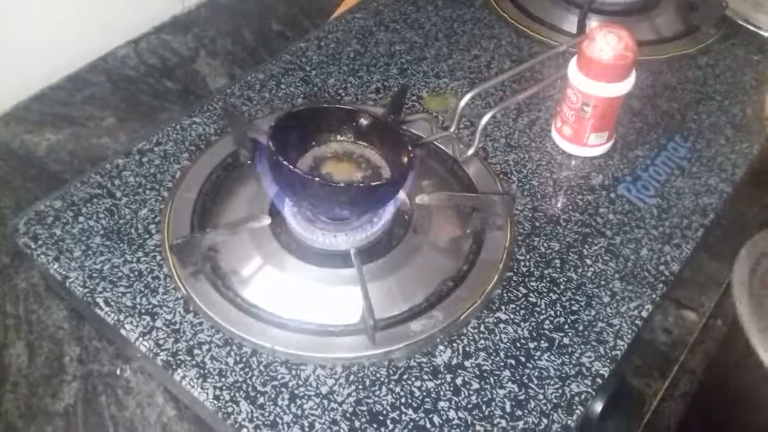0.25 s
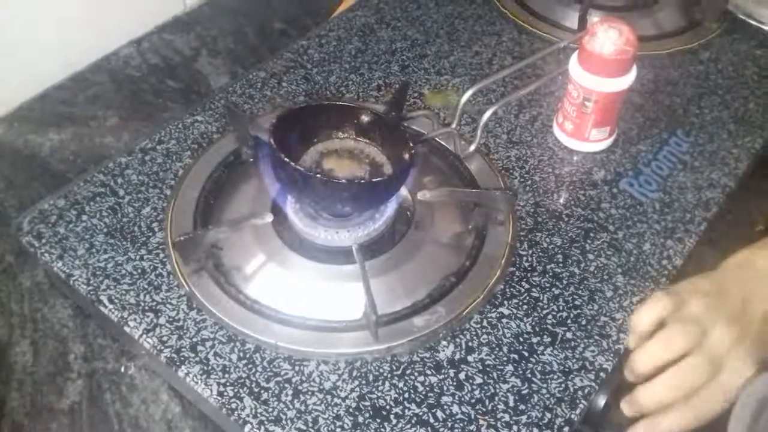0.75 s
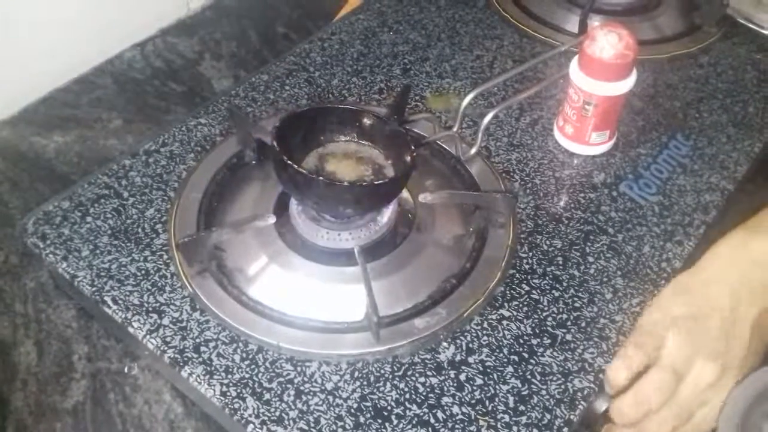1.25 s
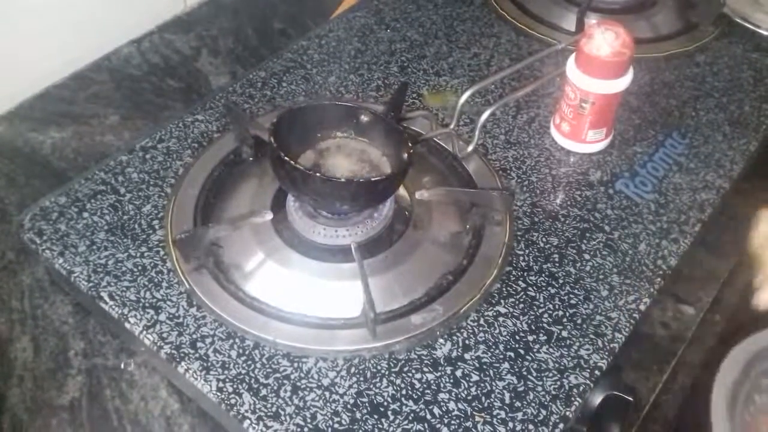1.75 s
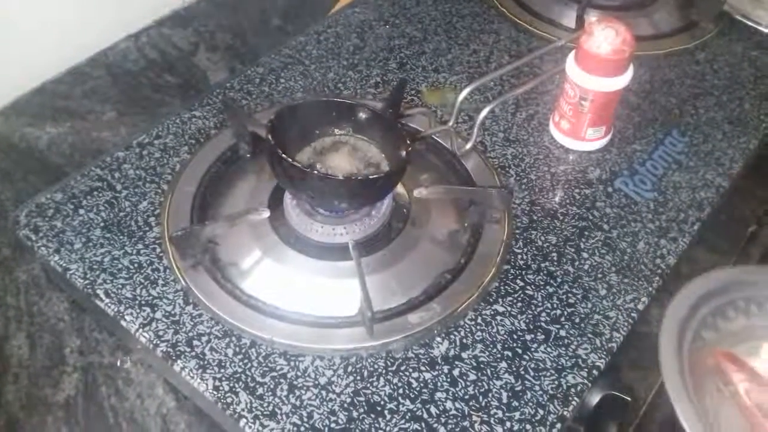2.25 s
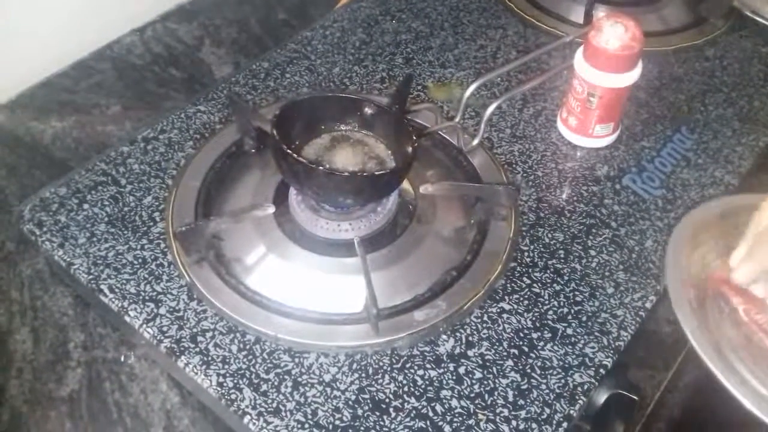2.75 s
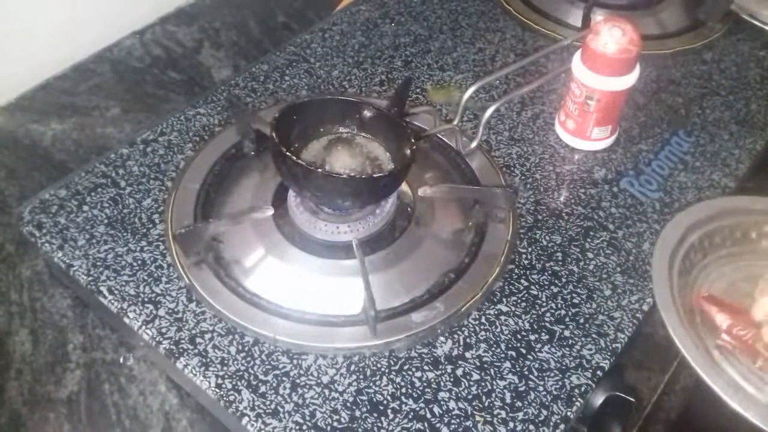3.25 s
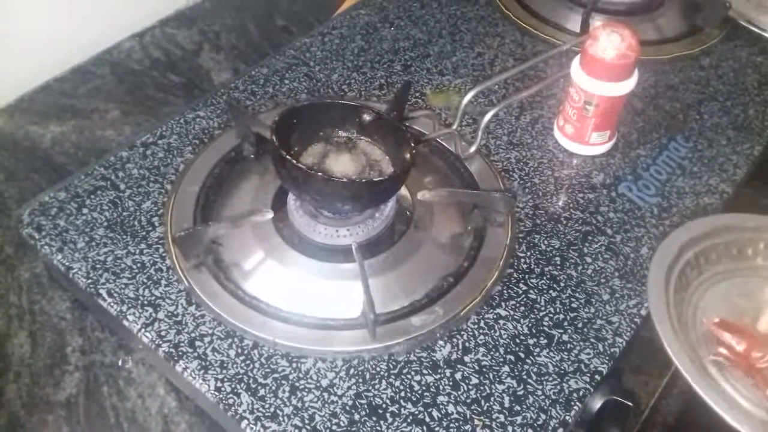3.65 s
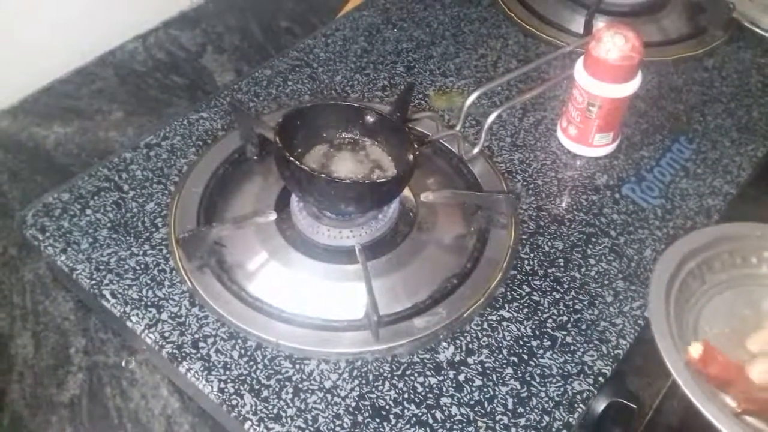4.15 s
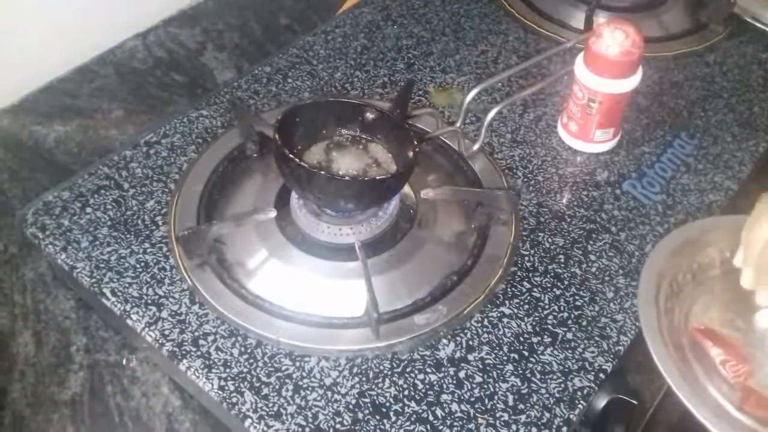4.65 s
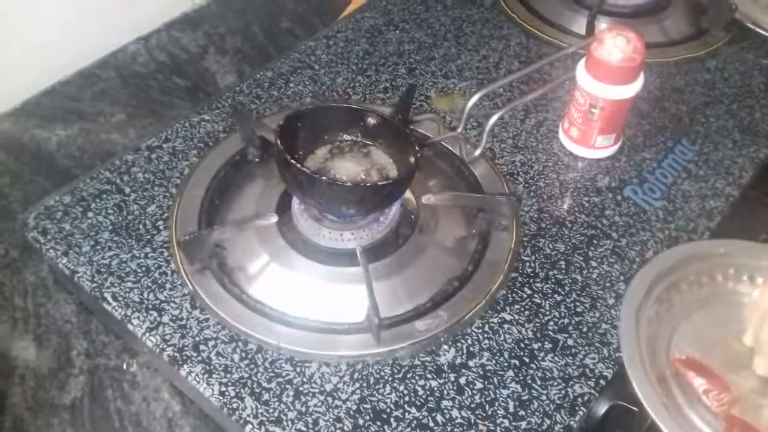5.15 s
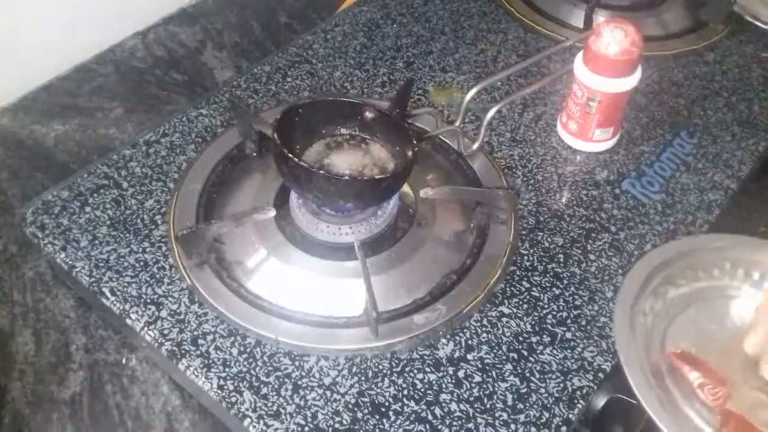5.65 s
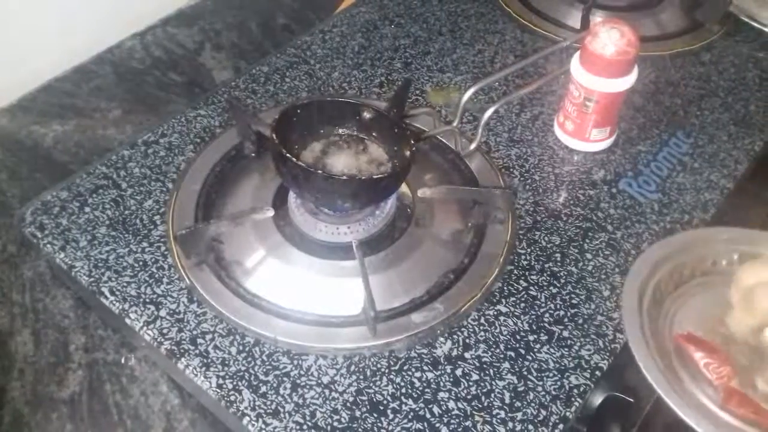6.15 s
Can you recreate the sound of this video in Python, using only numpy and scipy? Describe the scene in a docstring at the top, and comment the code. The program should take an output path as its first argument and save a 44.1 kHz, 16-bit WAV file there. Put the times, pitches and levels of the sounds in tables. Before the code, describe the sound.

Close to a small iron pan on a gas burner, hot oil sizzles, spits and gurgles over a soft flame. Mustard seeds burst with sharp bright snaps and short wet splutters of steam. The oil foams between one and two seconds, slightly lowering the snaps and changing the sizzle. From three seconds many pops are louder, crowding together at the end. Nearly mono, with a short hard kitchen reverberation.

```python
"""Mustard seeds pop in hot oil in a small iron pan on a gas burner, in a kitchen, heard from close by.
From the start the oil sizzles, spits and gurgles (bubble crackle, blurred notes) over a soft flame (noise).
Each husk bursts with a snap (a few cycles of a sine) and a spurt of steam that splutters (grainy noise).
Between 1 and 2 s the oil foams up: the snaps drop in pitch and the sizzle changes colour.
From about 3 s on many pops are louder."""
import sys
import numpy as np
from scipy import signal
from scipy.fft import rfft, irfft, next_fast_len
from scipy.io import wavfile
from scipy.ndimage import map_coordinates

SR = 44100
rng = np.random.default_rng(int(sys.argv[2]) if len(sys.argv) > 2 else 0)


def inscribe(sig):
    """Save sig as 16-bit PCM at rate SR to the path in sys.argv[1].

    A 1-D sig is mono; a 2-D sig holds one channel per row.
    Samples are clipped to [-1, 1] before scaling.
    """
    pcm = np.round(np.clip(np.atleast_2d(sig).T, -1, 1) * 32767)
    wavfile.write(sys.argv[1], SR, pcm.astype(np.int16))


N = 283122

# The loudest bursting seeds. Each row: start in seconds, then relative levels in dB of snap, steam, oil spray.
SEED_POPS = [(0.1026, -33.5, -25.5, -57), (0.1443, -21.5, -31, -46), (0.2883, -43, -28.5, -45),
             (0.4445, -20, -26, -39), (0.488, -35, -28.5, -44), (0.584, -26.5, -36, -41),
             (0.7906, -26.5, -31, -46.5), (0.943, -23.5, -31, -52), (0.9879, -33, -34, -60),
             (1.072, -32, -28, -45), (1.1328, -34, -36, -46), (1.1638, -27.5, -40, -59),
             (1.2114, -43, -36, -49), (1.3143, -35, -44, -49), (1.343, -27, -34, -45),
             (1.4163, -25, -31, -45.5), (1.4835, -28, -32, -53), (1.5348, -23, -35, -50),
             (1.577, -30, -22, -50), (1.6489, -23, -28.5, -40), (1.6923, -26, -25, -48),
             (1.7554, -37, -22, -41), (1.7659, -38, -25.5, -48), (1.786, -38, -22, -44),
             (1.7947, -32, -20, -34), (1.8116, -35, -40, -52), (2.052, -27, -29, -44.5),
             (2.1005, -31, -31.5, -43.5), (2.1379, -28, -34, -51), (2.265, -48, -37, -56),
             (2.3153, -46, -27.5, -73), (2.4439, -47, -27.5, -47.5), (2.4826, -23.5, -25, -45),
             (2.574, -27, -30, -42.5), (2.6141, -24, -27.5, -45), (2.7194, -27, -26, -43),
             (2.8125, -34, -31, -45), (2.8437, -19, -31, -44), (2.8976, -27.5, -49, -45),
             (2.9586, -33, -36, -47.5), (2.9846, -15, -18, -56), (3.0214, -30, -40, -44),
             (3.0612, -17, -28, -39), (3.0674, -21, -36, -45), (3.1462, -23, -26, -41),
             (3.1676, -14.5, -26, -70), (3.2749, -27, -38, -45), (3.3233, -24.5, -26, -44),
             (3.3925, -17, -31, -46), (3.562, -34, -34, -58), (3.6084, -15.5, -22.5, -38),
             (3.658, -40, -25.5, -48), (3.7347, -22.5, -17.5, -36.5), (3.8457, -27, -44, -47),
             (3.8853, -25.5, -30, -50), (3.9633, -33, -31, -48), (4.0031, -29, -29, -58),
             (4.0418, -31, -22, -37), (4.073, -25, -26.5, -38), (4.1411, -25, -28, -36),
             (4.2298, -24.5, -19, -41.5), (4.2867, -19, -24, -46), (4.3221, -25, -24, -48),
             (4.5047, -23.5, -32, -40), (4.5374, -17.5, -23, -40.5), (4.7164, -24, -25.5, -43.5),
             (4.8444, -32, -24.5, -41.5), (5.013, -29, -47, -46), (5.021, -20.5, -28.5, -45),
             (5.0878, -29, -18, -39.5), (5.0938, -17.5, -18, -50), (5.3009, -41, -36, -53.5),
             (5.3953, -34, -23.5, -42.5), (5.44, -18.5, -23.5, -55), (5.5199, -27, -23, -85),
             (5.5479, -29, -23.5, -67), (5.6121, -24.5, -28.5, -42.5), (5.6535, -25, -30, -50),
             (5.681, -31, -24.5, -39.5), (5.7012, -17, -22, -47), (5.7519, -19, -23, -35),
             (5.7987, -23.5, -33, -47), (5.8239, -21.5, -22, -43), (5.844, -17, -20.5, -42),
             (5.8889, -24, -27, -43), (6.0212, -20.5, -27, -47), (6.055, -18, -24, -38),
             (6.1108, -14.5, -17.5, -42), (6.1488, -18, -23, -42), (6.2032, -26, -29, -42),
             (6.2133, -22, -21.5, -37.5), (6.2633, -13.5, -28, -41), (6.2806, -15, -32, -43),
             (6.3057, -25, -23, -65), (6.3135, -12, -28.5, -48), (6.4124, -38, -19, -50)]
# Spectrum of fine oil spray. Each row: frequency in Hz, relative density in dB.
SPRAY_SPECTRUM = [(300, -44), (3500, -2), (5300, 10.5), (7000, 1.5), (10000, 3), (12500, -2.5), (16000, -2)]
CLEAR_HZ, FOAMY_HZ = 4135, 3838  # mean snap pitch in clear oil and in foam
TYPICAL_STEAM_DB = -25.5


def amp(db):
    """Decibels to gain."""
    return 10 ** (np.asarray(db) / 20)


def unit(x):
    """Scale to rms 1."""
    return x / np.sqrt(np.mean(x ** 2) + 1e-20)


def along(points, hz):
    """Read (Hz, value) points on a log axis."""
    f, v = np.transpose(points)
    return np.interp(np.log(hz + 1), np.log(f + 1), v)


def wobble(rate_hz):
    """A smooth random curve, rate_hz knots a second."""
    knots = rng.standard_normal(int(N * rate_hz / SR) + 4)
    return map_coordinates(knots, [np.arange(N) * rate_hz / SR])


def lumpy(t, rate_hz, knots, depth_db):
    """Random gain of rms 1 over times t, drawn in dB at rate_hz knots a second."""
    return unit(amp(depth_db * np.interp(t * rate_hz, np.arange(len(knots)), knots)))


def filtered(x, response):
    """x times a complex response of frequency."""
    m = next_fast_len(N + SR // 2)
    return irfft(rfft(x, m) * response(np.fft.rfftfreq(m, 1 / SR)), m)[..., :N]


def add(track, s, sound):
    """Mix a sound into the track from time s."""
    start = int(np.clip(round(s * SR), 0, N))
    track[start:start + len(sound)] += sound[:N - start]


def coloured(x, spectrum):
    """x with the given spectrum, at rms 1."""
    return unit(filtered(x, lambda hz: amp(along(spectrum, hz))))


def crackle(spectrum, rate_hz, spread_db):
    """Tiny bubbles bursting at random, rate_hz a second on average, of varying size."""
    bursts = (rng.random(N) < rate_hz / SR) * rng.choice([-1, 1], N)
    size_db = spread_db * np.clip(rng.standard_normal(N), -2, 2)
    return coloured(bursts * amp(size_db), spectrum)


def ragged(pitch_hz, blur_hz):
    """A noisy note of rms 1 that follows the pitch, about blur_hz wide to each side."""
    t = np.arange(len(pitch_hz)) / SR
    knots = rng.standard_normal((2, 400))
    a, b = [map_coordinates(k, [t * 2 * blur_hz], mode="mirror") for k in knots]
    phase = 2 * np.pi * np.cumsum(pitch_hz) / SR
    return unit(a * np.cos(phase) + b * np.sin(phase))


def foam(s):
    """Share of the oil covered by foam at time s, 0-1."""
    middle_s, length_s = 1.52, 1
    return np.clip(.5 + (s - middle_s) / length_s, 0, 1)


def sizzle(sizzle_db=-5.5, spray_db=-26, foam_db=4, foam_damp_db=-1.5, flicker_db=4.5):
    """The oil fizzes all along; as it foams up its colour changes and it throws more spray."""
    # Each row: time in seconds, overall level in dB before flicker.
    simmer = [(0.0, -39.5), (0.39, -43), (1.23, -44), (1.64, -42.5), (2.11, -44), (3.07, -38.5),
              (3.48, -45.5), (4.17, -37), (4.88, -46), (5.43, -40.5), (5.56, -40.5), (6.42, -38)]
    # Sizzle of clear oil, then of foamy oil. Each row: frequency in Hz, relative density in dB.
    fresh_spectrum = [(820, -40), (1400, -13), (1760, -10), (1900, -1), (2420, -1.5), (2960, -5.5),
                      (3080, 0), (3360, -1.5), (4370, 1), (5350, -21), (6240, -29), (7000, -26),
                      (9100, -52), (15400, -120)]
    foamy_spectrum = [(820, -84), (1400, -35), (1750, -0.5), (1900, 3), (2060, -0.5), (2450, 1),
                      (2650, -4.5), (2960, -3), (3820, 7.5), (4520, -4), (4830, -4), (7000, -27),
                      (9100, -26), (15400, -120)]
    t = np.arange(N) / SR
    cover = foam(t)
    fresh = crackle(fresh_spectrum, rate_hz=1500, spread_db=3.5)
    foamy = crackle(foamy_spectrum, rate_hz=900, spread_db=-0.5)
    spray = amp(spray_db + foam_db * cover) * crackle(SPRAY_SPECTRUM, rate_hz=2000, spread_db=6.5)
    fizz = amp(sizzle_db) * (np.sqrt(1 - cover) * fresh + amp(foam_damp_db) * np.sqrt(cover) * foamy)
    level_db = np.interp(t, *np.transpose(simmer)) + flicker_db * wobble(30)
    return amp(level_db) * (fizz + spray)


def flame(flame_db=-54.0):
    """The gas flame rushes with a slight flutter: coloured noise with a wobbling level."""
    # Each row: frequency in Hz, relative density in dB.
    rush_spectrum = [(20, 9), (50, -14), (80, -13), (125, -11), (170, -6.5), (255, -7.5), (370, -4.5),
                     (600, 0.5), (900, -3), (1200, -5), (1600, -2.5), (3000, -32.5)]
    flutter_db = 1.5 * wobble(25)
    return amp(flame_db + flutter_db) * coloured(rng.standard_normal(N), rush_spectrum)


def spits(gain_db=-11, t60_s=0.16, rise_s=0.00093, blur_hz=520, grain_db=4):
    """Now and then the wet oil spits with a throaty rasp that breaks up into droplets."""
    # Each row: start in seconds, relative level in dB, pitch in Hz.
    spit_events = [(0.0044, -30.5, 2097), (0.812, -24, 2290), (1.486, -19.5, 1907), (2.9846, -18.5, 2510),
                   (3.5694, -35, 2420), (4.2863, -19, 2460), (4.3202, -21, 3210), (4.8845, -29.5, 2360),
                   (5.3971, -22.5, 2445), (5.6162, -26.5, 2390), (6.0202, -21, 2520), (6.1108, -17, 2368),
                   (6.1372, -14.5, 2810)]
    out, t = np.zeros(N), np.arange(SR // 5) / SR
    for s, db, hz in spit_events:
        droplets = lumpy(t, 350, rng.standard_normal(100), grain_db)
        spurt = (1 - np.exp(-t / rise_s)) * amp(-60 * t / t60_s)
        add(out, s, amp(db + gain_db) * spurt * droplets * ragged(np.full(len(t), hz), blur_hz))
    return out


def burble(level_db=-53, spread_db=4, low_hz=260, high_hz=1500, decay_cycles=3, count=600):
    """Small bubbles blip all over the pan, each ringing a few cycles and rising a little."""
    out, t = np.zeros(N), np.arange(SR // 20) / SR
    places = rng.random((count, 2))
    chances = np.clip(rng.standard_normal(count), -2, 2)
    for (when, size), chance in zip(places, chances):
        hz = high_hz + (low_hz - high_hz) * size
        age = t * hz / decay_cycles
        phase = 2 * np.pi * hz * t * (1 + 0.015 * np.minimum(age, 4))
        blip = (1 - np.exp(-6 * age)) * np.exp(-age) * np.sin(phase)
        add(out, when * N / SR, amp(level_db + spread_db * chance) * np.sqrt(hz / low_hz) * blip)
    return out


def snap_pitch(s):
    """Mean pitch of a bursting husk in Hz: it drops as the oil foams."""
    return CLEAR_HZ + (FOAMY_HZ - CLEAR_HZ) * foam(s)


def snaps(seeds, rise_s=0.00058, echo_db=-27, tick_db=-24, scatter=0.033):
    """A split husk rings for a few cycles; the pan wall and stove top scatter it back."""
    out, t = np.zeros(N), np.arange(SR // 20) / SR
    for s, db in seeds:
        hz = snap_pitch(s) * np.exp(scatter * rng.standard_normal())
        snap = t / rise_s * np.exp(1 - t / rise_s) * np.sin(2 * np.pi * hz * t)
        walls = rng.standard_normal(len(t)) * (t > .002) * np.exp(-t / 0.012)
        echo = signal.fftconvolve(snap, walls)[:len(t)]
        tick = np.diff(rng.standard_normal(len(t) + 1)) * np.exp(-t / 0.00012)  # the husk tearing
        add(out, s, amp(db) * (snap + amp(tick_db) * tick + amp(echo_db) * unit(echo)))
    return out


def small_seeds(level_db=-34.0, spread_db=4.0, mist_db=-65, mist_spread_db=3, mist_t60_s=0.047, count=200):
    """Many smaller seeds crack at random among the loud ones; each throws a brief mist of oil."""
    times = rng.uniform(0, N / SR, count)
    size, wet = np.clip(rng.standard_normal((count, 2)), -2, 2).T
    mist_power, t = np.zeros(N), np.arange(SR // 10) / SR
    for s, db in zip(times, mist_db + spread_db * size + mist_spread_db * wet):
        add(mist_power, s, amp(db - 60 * t / mist_t60_s) ** 2)
    cracks = snaps(zip(times, level_db + spread_db * size), rise_s=0.00041, scatter=0.068)
    return cracks + np.sqrt(mist_power) * crackle(SPRAY_SPECTRUM, rate_hz=3900, spread_db=3)


def gurgles(gain_db=-10, swell_s=0.01043, glug_db=-12, glug_hz=320, grain_db=2.5):
    """A steam pocket glugs, and its ragged note climbs as it nears the surface and opens."""
    # Steam pockets. Each row: time in seconds, relative level in dB, pitch in Hz.
    pockets = [(0.104, -37, 906), (0.188, -40.5, 834), (0.528, -31, 1227), (0.561, -35, 862),
               (0.582, -37.5, 1075), (0.793, -37.5, 752), (1.193, -36, 665), (1.25, -36.5, 1194),
               (1.486, -30.5, 983), (1.705, -35, 1173), (1.813, -33, 1194), (2.202, -35, 1048),
               (2.309, -38.5, 1253), (2.557, -40, 1143), (2.595, -45, 957), (2.727, -41, 955),
               (2.81, -40, 1098), (2.932, -39, 737), (3.121, -42, 873), (3.226, -32.5, 1126),
               (3.353, -41, 1190), (3.459, -37, 1200), (3.519, -42, 928), (3.713, -34, 853),
               (3.906, -38.5, 873), (4.306, -37.5, 723), (4.511, -35, 964), (4.593, -34.5, 850),
               (4.673, -34.5, 1107), (4.773, -37.5, 1198), (4.959, -38, 1166), (5.018, -40.5, 1103),
               (5.249, -35, 1107), (5.303, -39, 944), (5.492, -36.5, 1190), (6.002, -37, 1210),
               (6.111, -38, 863), (6.233, -34, 1263), (6.398, -38, 1190)]
    out, t = np.zeros(N), np.arange(SR // 10) / SR
    blur_hz, octaves_per_s = 210, 22
    for s, db, hz in pockets:
        haste, climb = np.exp(rng.standard_normal(2) * [.15, .3])
        pitch_hz = hz * 2 ** np.clip(climb * octaves_per_s * (t - swell_s), -.7, .2)
        glug = amp(glug_db) * ragged(np.full(len(t), glug_hz), blur_hz)
        age = haste * t / swell_s
        swell = age * np.exp(1 - age)
        lumps = lumpy(t, 200, rng.standard_normal(32), grain_db)
        add(out, s - .002, amp(db + gain_db) * swell * lumps * (ragged(pitch_hz, blur_hz) + glug))
    return out


def splutter(levels_db, spectrum, shifts, gain_db, rise_s, burst, grain_db, t60_s, colour_db=2):
    """Steam leaves each seed in a hard first burst, then dies away in small bubbles; hard pops last longer."""
    out, t = np.zeros(N), np.arange(SR // 3) / SR
    hz = np.fft.rfftfreq(len(t), 1 / SR)
    for (_s, _, steam_db, _), db, shift in zip(SEED_POPS, levels_db, shifts):
        noise, lumps, colour = rng.standard_normal((3, len(t)))
        own_db = colour_db * np.interp(hz / 1800, np.arange(len(t)), colour)  # no two husks split alike
        steam = unit(irfft(rfft(noise) * amp(along(spectrum, hz / shift) + own_db), len(t)))
        bubbles = lumpy(t, 330, lumps, grain_db)
        life_s = t60_s * np.exp(0.0148 * (steam_db - TYPICAL_STEAM_DB))
        spurt = (1 - np.exp(-t / rise_s)) * (bubbles * amp(-60 * t / life_s) + burst * np.exp(-t / 0.0014))
        add(out, _s, amp(db + gain_db) * spurt * steam)
    return out


def steam_spurts(body_db=-36.5, body_follows=0.49, body_with_spray=0.094):
    """Each pop splutters near its snap pitch, with a lower body that grows more slowly, and throws fine spray."""
    # Body, then main splutter. Each row: frequency in Hz, relative density in dB, before the shift per seed.
    low_spectrum = [(70, -25), (200, -21.5), (700, -9.5), (1300, -5), (1850, 5.5), (2500, 1.5), (3000, -7),
                    (3800, -22.5)]
    high_spectrum = [(150, -49), (900, -25.5), (2200, -26), (3100, -7), (3700, 3.5), (4100, -1.5),
                     (4500, -6), (4800, -11), (5500, -12.5), (6600, -30.5), (9000, -53)]
    s, _, steam_db, spray_db = np.transpose(SEED_POPS)
    varied = np.exp(0.078 * rng.standard_normal(len(SEED_POPS)))
    low_db = body_db + body_follows * (steam_db - TYPICAL_STEAM_DB)
    low_db = low_db + body_with_spray * (spray_db - spray_db.mean())
    low = splutter(low_db, low_spectrum, varied, gain_db=-3, rise_s=0.00084,
                   burst=0.85, grain_db=1.6, t60_s=0.14, colour_db=2.5)
    high = splutter(steam_db, high_spectrum, snap_pitch(s) / FOAMY_HZ, gain_db=-7.5, rise_s=0.001,
                    burst=0.31, grain_db=1.5, t60_s=0.14)
    spray = splutter(spray_db, SPRAY_SPECTRUM, varied, gain_db=-3.5, rise_s=0.00005,
                     burst=1.0, grain_db=2.2, t60_s=0.18)
    return low + high + spray


def kitchen(x, count=12):
    """Hard walls answer with a short tail, bass dying first, redrawn for each of count stretches."""
    # Each row: frequency in Hz, 60 dB decay time in seconds.
    decay_times = [(200, 0.16), (2000, 0.5), (5000, 0.5), (14000, 0.55)]
    out, start = np.zeros(N), 0
    for piece in np.array_split(x, count):
        hz, t, z = signal.stft(rng.standard_normal(SR // 2), SR, nperseg=256)
        decay = amp(-60 * t / along(decay_times, hz)[:, None])
        tail = signal.istft(z * decay, SR, nperseg=256)[1]
        add(out, start / SR + .007, signal.fftconvolve(piece, tail / np.linalg.norm(tail)))
        start += len(piece)
    return out


def pan(x):
    """The pan and burner add their narrow resonances to whatever sounds in them."""
    # Each row: centre in Hz, width in Hz, gain in dB.
    modes = [(257.8, 18, 9.5), (285, 19.5, 2), (443, 6.1, 7), (846, 48, 0), (964, 79, -3), (1176, 27, 3),
             (1892, 52, -3), (2170, 7.3, -42), (2363, 53, -6), (2460, 54, -5.5), (2640, 4.7, -43),
             (3120, 36, -13), (3980, 8.6, -25), (3680, 140, -18), (4040, 10, -17), (4473, 79, -2)]

    def response(f):
        return 1 + sum(amp(db) * 1j * f * w / (c * c - f * f + 1j * f * w) for c, w, db in modes)
    return filtered(x, response)


def spread(x, hiss_db=-70):
    """Near mono: the two sides differ only by diffuse scatter and a faint hiss."""
    # Each row: frequency in Hz, scatter on the side relative to mid in dB.
    side_levels = [(30, -29), (100, -24), (250, -38), (650, -36), (1100, -60), (2500, -81), (4200, -67),
                   (6000, -32), (9000, -34), (15000, -30)]
    # Each row: frequency in Hz, relative density in dB.
    hiss_spectrum = [(30, -5), (150, 11), (600, 4), (1000, -5.5), (4500, -16.5), (6500, 2), (15000, 0)]
    z = signal.stft(x, nperseg=128)[2]
    random_phase = np.exp(2j * np.pi * rng.random(z.shape))
    scatter = unit(signal.istft(z * random_phase, nperseg=128)[1][:N]) * np.std(x)
    hiss = amp(hiss_db) * coloured(rng.standard_normal(N), hiss_spectrum)
    side = filtered(scatter, lambda hz: amp(along(side_levels, hz))) + hiss
    return np.array([x + side, x - side])


def scene():
    """Pops, spits, bubbles, sizzle and flame at the stove, in the room."""
    pops = snaps(np.array(SEED_POPS)[:, :2]) + steam_spurts()
    oil = pops + small_seeds() + spits() + gurgles() + burble() + sizzle()
    return spread(pan(oil + amp(-7) * kitchen(oil) + flame()))


def record(dry, low_cut_hz=32, top_hz=16100):
    """The microphone thins the deep bass; nothing is kept above top_hz."""
    return filtered(dry, lambda hz: 1j * hz / (1j * hz + low_cut_hz) * (hz < top_hz))


dry = scene()
out = record(dry)
inscribe(out)
```